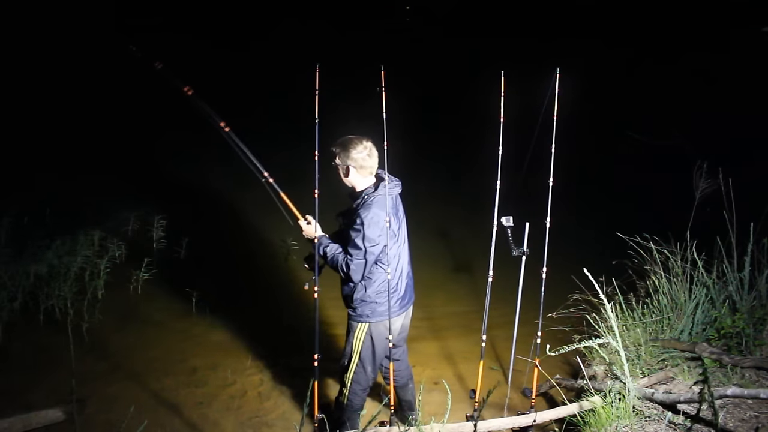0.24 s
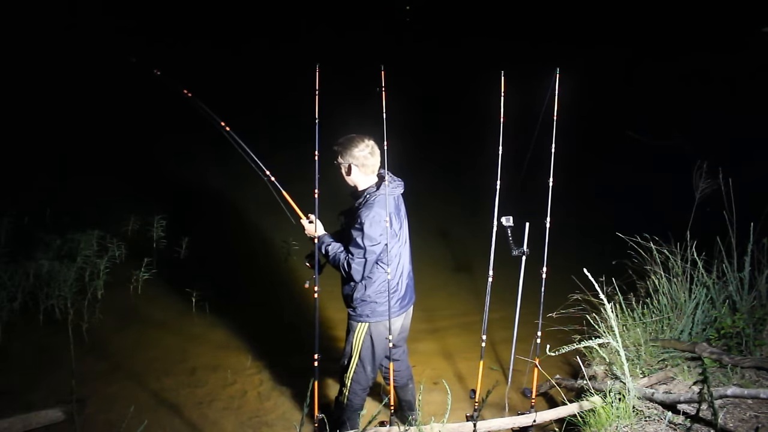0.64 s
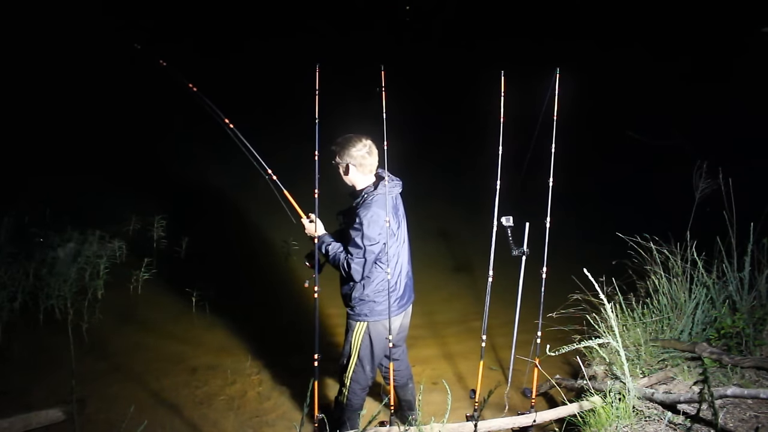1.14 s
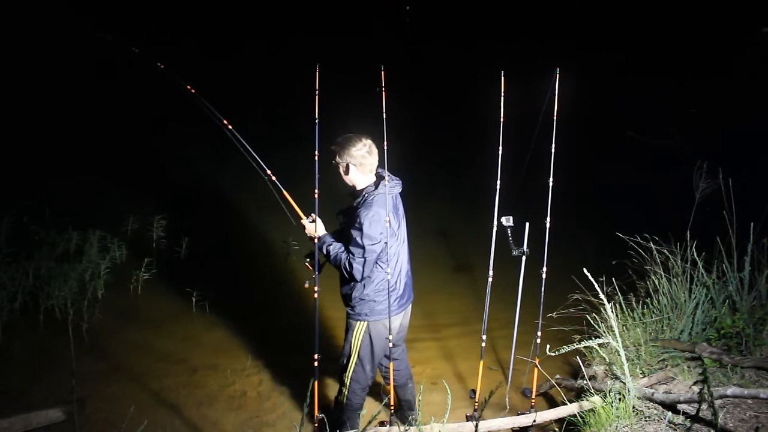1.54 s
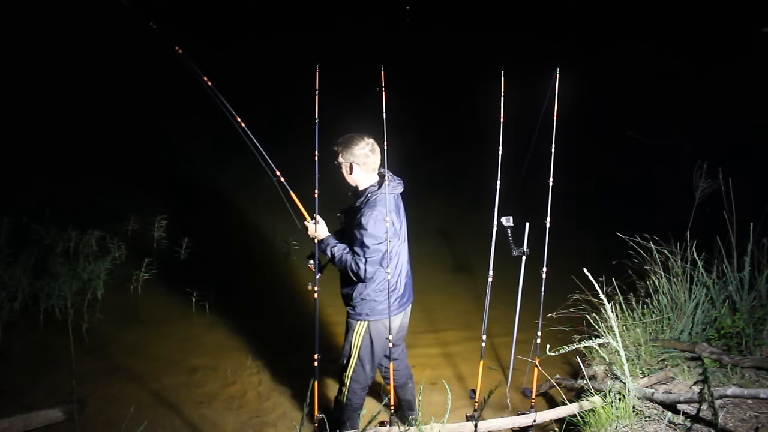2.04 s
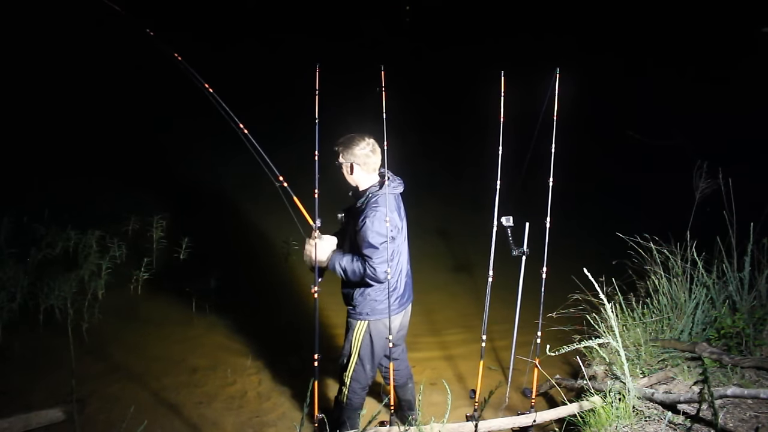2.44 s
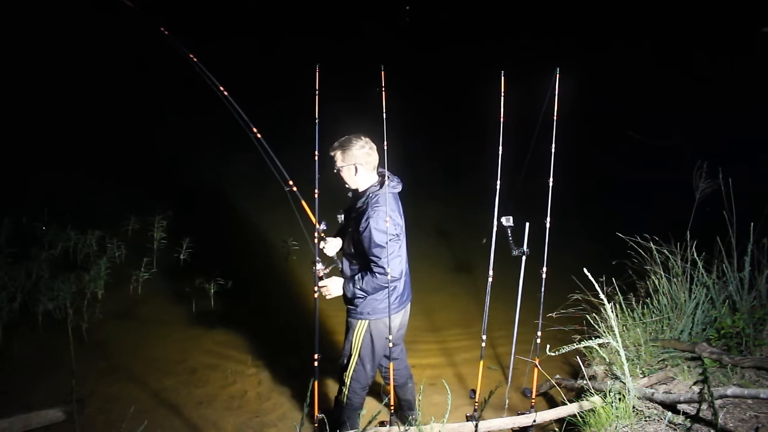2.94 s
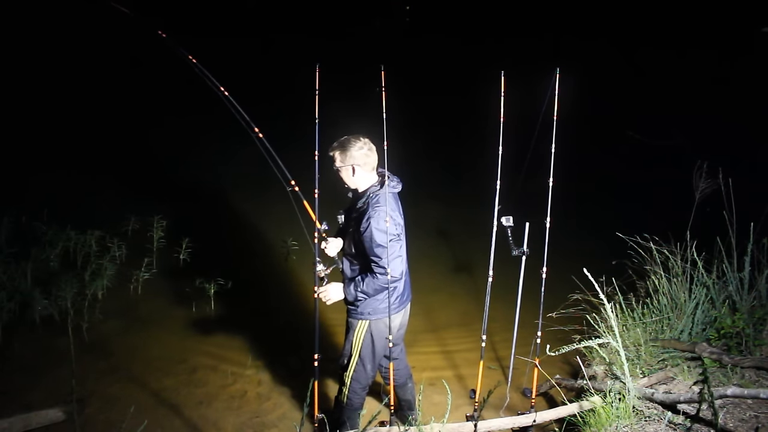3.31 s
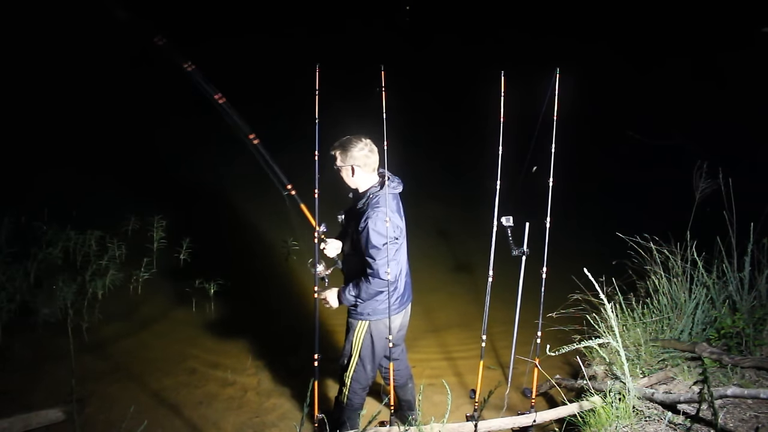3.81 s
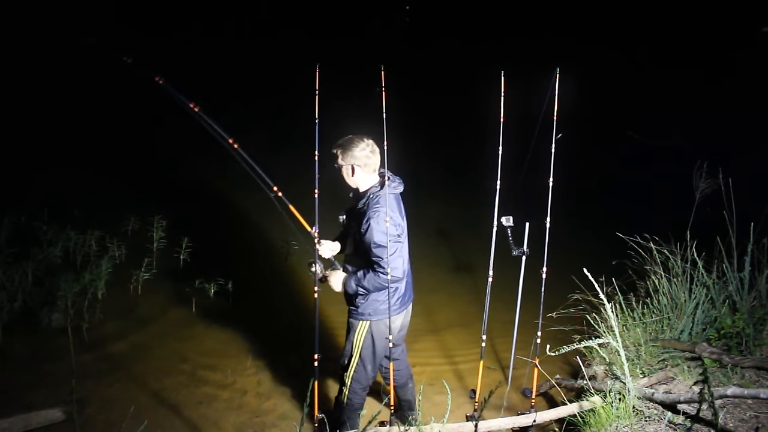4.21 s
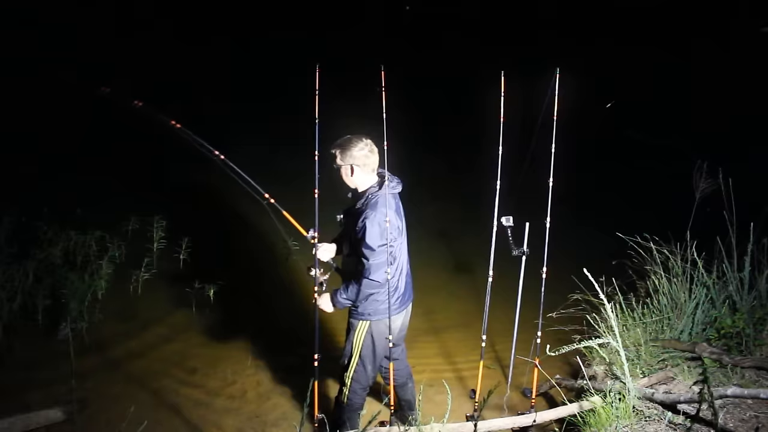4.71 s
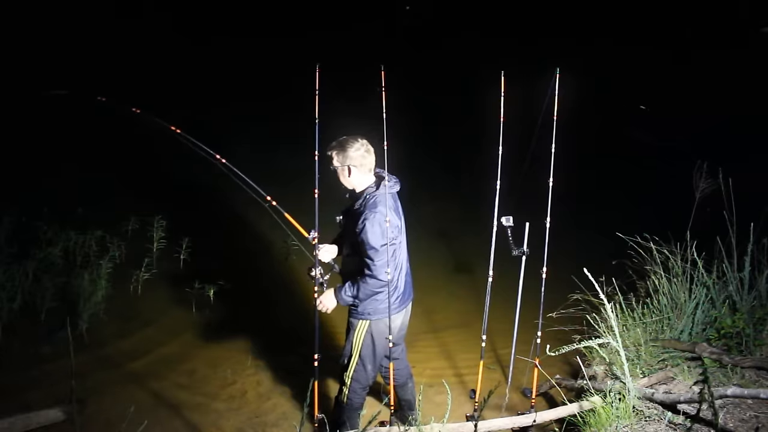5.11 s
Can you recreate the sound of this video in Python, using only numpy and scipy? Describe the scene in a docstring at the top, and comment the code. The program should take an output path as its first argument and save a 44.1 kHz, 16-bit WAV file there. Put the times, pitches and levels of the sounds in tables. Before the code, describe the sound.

A hooked fish thrashes and slaps in shallow water at night, settling to drips before a fishing reel whirrs and squeals, insects trilling throughout.

```python
"""Night on a river bank: insects trill between 5 and 6 kHz throughout, over a low far rumble and hiss.
At once a hooked fish thrashes: noise bursts make the slaps, droplet noise the spray, climbing sines the bubbles.
From about two seconds this dies away into drips and faint clicks.
Near four seconds the reel is wound in short pushes: ringing noise whirrs and thin tones squeal on top."""
import sys
import numpy as np
from scipy import signal
from scipy.fft import rfft, irfft, next_fast_len
from scipy.io import wavfile

SR = 44100
rng = np.random.default_rng(int(sys.argv[2]) if len(sys.argv) > 2 else 0)


def master(y):
    """Save y as 16-bit WAV."""
    cut = np.clip(np.atleast_2d(y).T, -1, 1)
    pcm = np.round(cut * 32767)  # scale
    wavfile.write(sys.argv[1], SR, pcm.astype(np.int16))


N = 235916
TIME = np.arange(N) / SR   # seconds


def from_db(db):
    """Turns a level in dB into a gain."""
    return 10 ** (np.asarray(db) / 20)


def rms_one(x):
    """Scales a sound to rms 1."""
    return x / np.sqrt(np.mean(x ** 2) + 1e-20)


def in_time(rows):
    """Draws straight lines between the rows of a curve, for every sample."""
    seconds, *columns = np.transpose(rows)
    return [np.interp(TIME, seconds, column) for column in columns]


def at_hz(points, hz, axis=1):
    """Reads one column of a spectrum on a log-frequency axis."""
    points = np.array(points)
    return np.interp(np.log(hz), np.log(points[:, 0]), points[:, axis])


def drift(rate_hz):
    """Smooth chance with spread 1: noise through a low-pass, worked out at every 40th sample."""
    step = 40
    r = np.exp(-2 * np.pi * rate_hz * step / SR)
    noise = rng.standard_normal(N // step + 2002)
    slow = signal.lfilter([1], [1, -2 * r, r * r], noise)[2000:]   # skip the filter's start
    return np.interp(np.arange(N) / step, np.arange(len(slow)), rms_one(slow))


def resonance(x, hz, width_hz):
    """Lets through one peak of frequencies, with gain 1 on top."""
    r = np.exp(-np.pi * width_hz / SR)
    feedback = [1, -2 * r * np.cos(2 * np.pi * hz / SR), r * r]
    return signal.lfilter([(1 - r * r) / 2, 0, (r * r - 1) / 2], feedback, x)


def coloured(x, spectrum):
    """Shapes a sound by a spectrum, then scales it to rms 1."""
    hz = np.fft.rfftfreq(N, 1 / SR) + 1   # + 1 keeps the logarithm finite
    return rms_one(irfft(rfft(x) * from_db(at_hz(spectrum, hz)), N))


def add(out, start, sound):
    """Mixes a short sound in at a time in seconds."""
    i = round(start * SR)
    out[i:i + len(sound)] += sound[:N - i]


def held(start, length, attack, release):
    """Rises from the start, holds, and falls after the length (all in seconds); 0 to 1."""
    rising = (TIME - start) / attack
    falling = 1 - (TIME - start - length) / release
    return np.clip(np.minimum(rising, falling), 0, 1)


# Colour of the still background. Each row: frequency in Hz, relative level in dB.
NIGHT_SPECTRUM = [(25, -25), (55, -5.5), (115, 1), (160, -3), (400, -5), (800, -11), (1600, -11.5),
                  (3200, -15.5), (4600, -17.5), (7000, -21), (10500, -24), (13000, -29), (16000, -29)]
# How alike left and right are. Each row: frequency in Hz, likeness from -1 (opposite) to 1 (same).
NIGHT_LIKENESS = [(60, 0.88), (150, 0.31), (380, -0.16), (950, -0.48), (2380, -0.31), (5980, -0.082),
                  (15000, -0.18)]
NIGHT_DB = -51


def night():
    """Far rumble and hiss: shared noise and opposed noise are mixed by likeness at each frequency."""
    hz = np.fft.rfftfreq(N, 1 / SR) + 1
    alike = np.clip(at_hz(NIGHT_LIKENESS, hz), -1, 1)
    mid, side = rfft(rng.standard_normal((2, N))) * from_db(at_hz(NIGHT_SPECTRUM, hz))
    pair = irfft(np.sqrt(1 + alike) * mid + np.sqrt(1 - alike) * side * [[1], [-1]], N)
    return from_db(NIGHT_DB) * rms_one(pair) * from_db([[-.7], [.7]])   # right a little louder


# The insect chorus. Each row: pitch in Hz, width of its wandering in Hz, level in dB.
INSECT_CHORUS = [(5020, 200, -62), (5228, 16, -58), (5262, 60, -58), (5336, 30, -59), (5600, 160, -66),
                 (5742, 30, -65), (5823, 50, -65), (5915, 30, -69), (10500, 120, -77)]
TRILL_PER_S = 37.35


def insects():
    """Each singer is a wavering tone pulsed in groups of three wing strokes; far ones blur into narrow noise."""
    turn = 2 * np.pi * TRILL_PER_S * TIME
    pulsing = 1 + .33 * np.cos(turn + 1.8) + .2 * np.cos(3 * turn + 3.0)
    out = np.zeros((2, N))
    for hz, width_hz, level_db in INSECT_CHORUS:
        pitch = hz + .5 * width_hz * drift(40.37)
        near = np.sqrt(2) * np.sin(2 * np.pi * np.cumsum(pitch) / SR)
        noise = rng.standard_normal((2, N))
        far = resonance(resonance(noise, hz, width_hz + 40), hz, 2.0 * width_hz + 40)
        out += from_db(level_db) * (near * pulsing + 1.22 * rms_one(far))
    out[1] = np.roll(out[1], 1)   # the near singers reach the left one sample earlier
    return out * from_db(0.11 * drift(2.5)) * from_db([[-1.1], [.1]])


# Whirrs of the reel: pushes and one weaker idle stretch between them.
# Each row: start in seconds, length in seconds, whirr level in dB.
REEL_WHIRRS = [(3.842, 0.29, -50), (4.17, 0.26, -50.5), (4.437, 0.21, -57), (4.583, 0.315, -50.5)]
# Ringing tones of the reel housing. Each row: frequency in Hz, width in Hz, relative level in dB.
HOUSING_MODES = [(830, 55, 0), (982, 40, -3.5), (1230, 120, -0.5), (1500, 210, 7), (1640, 30, 0),
                 (2070, 180, -15), (2660, 230, -6), (3300, 130, -27)]
# Short squeals of the gears, mostly climbing.
# Each row: start in seconds, length in seconds, first pitch in Hz, last pitch in Hz, level in dB.
GEAR_SQUEALS = [(3.954, 0.027, 1496, 1505, -55), (4.042, 0.073, 1533, 1640, -51),
                (4.199, 0.077, 1050, 1460, -58), (4.266, .1, 1517, 1850, -59),
                (4.403, 0.057, 1650, 1673, -54), (4.65, 0.098, 1650, 1677, -48),
                (4.747, 0.038, 984, 1020, -47.5), (4.767, .035, 1316, 1310, -44),
                (4.804, 0.021, 1400, 1620, -47), (4.843, 0.046, 1320, 1330, -54),
                (4.897, 0.035, 1400, 1645, -52)]
WHIRR_ATTACK_S, WHIRR_RELEASE_S, SQUEAL_EDGE_S = 0.11, 0.09, 0.0069


def reel():
    """Rough gear contacts ring the housing; a hoarse whine rides on top. It sits a little to the right."""
    whirr = np.zeros(N)
    for start, length, level_db in REEL_WHIRRS:
        whirr += from_db(level_db) * held(start, length, WHIRR_ATTACK_S, WHIRR_RELEASE_S)
    rub = rng.standard_normal(N) * from_db(1.0 * drift(66))
    housing = np.zeros(N)
    for hz, width_hz, level_db in HOUSING_MODES:
        housing += from_db(level_db + 2.5 * drift(8)) * rms_one(resonance(rub, hz, width_hz))
    waver_hz = 30 * drift(94)
    hoarse = 0.85 + 0.36 * drift(45)
    whine = np.zeros(N)
    for start, length, first_hz, last_hz, level_db in GEAR_SQUEALS:
        pitch = np.interp(TIME, [start, start + length], [first_hz, last_hz]) + waver_hz
        tone = np.sin(2 * np.pi * np.cumsum(pitch) / SR)
        whine += from_db(level_db) * held(start, length, SQUEAL_EDGE_S, SQUEAL_EDGE_S) * tone
    return (whirr * rms_one(housing) + hoarse * whine) * from_db([[-1.2], [1.2]])


# The microphone pair for sound from the water. Each row: frequency in Hz, left minus right in dB,
# lead of the left in radians, level of the scattered echoes in dB.
MICROPHONES = [(98, -4, 0.12, 2), (396, -4, 0.38, -23), (900, -2, 0.38, -12), (2730, 0.5, 0.61, -10),
               (6800, 0, 0.96, -9.5), (9400, -4, 1.27, -1.5), (16000, 0, 3.1, -3)]


def microphone_pair(x):
    """Left and right differ in level and phase; short echoes off the bank differ in each."""
    size = next_fast_len(N + SR // 4)
    hz = np.fft.rfftfreq(size, 1 / SR) + 1
    t = np.arange(SR // 5) / SR
    # half of the difference goes to the left, the opposite half to the right
    half = from_db(at_hz(MICROPHONES, hz, axis=1) / 2) * np.exp(.5j * at_hz(MICROPHONES, hz, axis=2))
    direct = np.array([half, 1 / half])
    echoes = rng.standard_normal((2, len(t))) * from_db(-60 * t / 0.17)   # 60 dB down in 0.17 s
    echoes = echoes / np.linalg.norm(echoes, axis=1, keepdims=True)
    scattered = from_db(at_hz(MICROPHONES, hz, axis=3)) * rfft(echoes, size)
    return irfft(rfft(x, size) * (direct + scattered), size)[:, :N]


def water_ring(level_db, hz, t60, rise, rough=0.):
    """A damped sine that climbs, as a bubble does when it nears the surface; its level wavers at random."""
    t = np.arange(int(1.2 * t60 * SR) + 8) / SR
    swell = 1 - np.exp(-t * hz / 0.42)   # starts within about half a cycle
    waver = 1 + rough * np.interp(t * hz / 3, np.arange(60), rng.standard_normal(60))
    tone = np.sin(2 * np.pi * hz * (t + rise * t * t / 2))
    return from_db(level_db - 60 * t / t60) * swell * waver * tone


# Water rings: bubbles, drips and the brief ring of slap cracks.
# Each row: start in seconds, level in dB, first pitch in Hz, time to fall 60 dB in seconds.
WATER_RINGS = [(0.024, -38, 470, 0.061), (.047, -19.5, 662, 0.045), (0.086, -34, 570, 0.048),
               (.105, -28, 680, 0.048), (.19, -37, 422, 0.18), (.224, -28, 444, 0.13),
               (.258, -26, 650, 0.097), (0.28, -21, 530, 0.02), (.303, -26, 463, 0.036),
               (.332, -28, 624, 0.031), (.376, -26.5, 331, 0.072), (0.413, -34, 207, 0.081),
               (.573, -24.5, 348, 0.027), (0.591, -29, 440, 0.053), (.636, -31, 145, 0.09),
               (0.7262, -18.5, 870, 0.02), (0.812, -27.5, 340, 0.027), (0.846, -38, 234, 0.11),
               (.886, -21, 980, .04), (.909, -25, 1010, 0.019), (.944, -33.5, 776, 0.12),
               (.977, -24.5, 526, 0.036), (0.995, -16.5, 397, 0.022), (.997, -28, 225, 0.1),
               (.9962, -6, 2500, .006), (.997, 0, 2150, .005), (1.007, -19, 510, 0.029),
               (1.014, -27, 380, 0.013), (1.079, -34.5, 1116, 0.053), (1.19, -34.5, 650, .037),
               (1.203, -30.5, 1462, 0.096), (1.206, -30, 4120, .039), (1.245, -34, 770, 0.035),
               (1.285, -41, 406, 0.044), (1.294, -31, 944, 0.039), (1.35, -28, 734, 0.03),
               (1.469, -35.5, 1050, 0.047), (1.479, -27, 2600, 0.013), (1.54, -42.5, 334, 0.086),
               (1.583, -38.5, 410, 0.12), (1.594, -34, 1020, 0.038), (1.656, -41, 1020, 0.11),
               (1.704, -23.5, 1130, 0.017), (1.71, -25.5, 258, .19), (1.71, -26, 336, 0.083),
               (1.835, -50, 462, .19), (1.885, -49, 897, 0.049), (1.976, -37, 959, 0.066),
               (2.07, -41.5, 4100, .04), (2.08, -49, 605, 0.087), (2.124, -35, 1440, 0.034),
               (2.135, -38.5, 952, 0.062), (2.15, -35, 860, 0.053), (2.188, -38, 4630, .023),
               (2.217, -39.5, 2400, .015), (2.292, -41, 2320, .02), (2.355, -46, 4000, .027),
               (2.413, -40, 1660, 0.026), (2.46, -47.5, 714, 0.043), (3.077, -46, 1630, .02),
               (3.433, -45.5, 600, 0.036), (4.042, -45.5, 543, 0.2), (4.042, -41, 2930, 0.027),
               (5.038, -46, 3040, 0.065), (5.07, -44, 1200, 0.017)]
# Thin bright ticks. Each row: start in seconds, level in dB.
BRIGHT_TICKS = [(0.407, -34.5), (.7926, -36), (1.813, -41), (2.3461, -48), (2.4588, -48), (2.4998, -46),
                (3.0784, -47), (3.452, -45), (4.0417, -48), (4.9013, -49.5), (5.0357, -48.5), (5.064, -45)]
RING_RISE_PER_S = 1.16   # share of the first pitch
# Stray drips start at a time and thin out from then on.
DRIPS_FROM_S, DRIPS_THIN_S = 1.75, 0.41
DRIP_DB, DRIP_SPREAD_DB, DRIP_CYCLES = -52, 2, 54   # cycles: how many to fall 60 dB
TICK_HZ, TICK_WIDTH_HZ = 8800, 3600


def rings_and_ticks():
    """Water rings and stray drips are climbing sines; bright ticks are short noise bursts."""
    out = np.zeros(N)
    for start, level_db, hz, t60 in WATER_RINGS:
        add(out, start, water_ring(level_db, hz, t60, RING_RISE_PER_S, rough=.22))
    for when, size, pitch in rng.random((60, 3)):
        start = DRIPS_FROM_S - DRIPS_THIN_S * np.log(when)
        hz = 900 * 5 ** pitch
        level_db = DRIP_DB - DRIP_SPREAD_DB * np.log(size + 0.15)
        if start < N / SR:
            add(out, start, water_ring(level_db, hz, DRIP_CYCLES / hz, RING_RISE_PER_S))
    t = np.arange(SR // 20) / SR
    for start, level_db in BRIGHT_TICKS:
        burst = rms_one(resonance(rng.standard_normal(len(t)), TICK_HZ, TICK_WIDTH_HZ))
        add(out, start, from_db(level_db - 60 * t / 0.012) * burst)
    return out


# Colour of the spray. Each row: frequency in Hz, relative level in dB.
SPRAY_SPECTRUM = [(530, -33), (900, -8), (1470, 3), (1770, 1.5), (5350, -3.5), (9530, -14), (14900, -22),
                  (16000, -35)]


def patter():
    """Droplets of uneven size, as random clicks, over a rush of noise."""
    falls = rng.random(N) < 6000 / SR   # about 6000 droplets a second
    size_db = 1.3 * np.minimum(rng.exponential(1, N), 4)
    drops = falls * rng.standard_normal(N) * from_db(size_db)
    rush = .6 * rng.standard_normal(N)
    return coloured(rms_one(drops) + rush, SPRAY_SPECTRUM) * from_db(1.2 * drift(25))


# Churned water calming down. Each row: time in seconds, gurgle level in dB, spray level in dB.
CALMING = [(0, -35.5, -37.5), (.14, -39, -36), (.28, -42.5, -38), (.36, -39.5, -39), (.44, -41.5, -37),
           (.54, -46.5, -43), (.62, -38.5, -43.5), (.74, -47, -44), (.86, -46, -43), (.97, -46, -44),
           (1.09, -60, -43.5), (1.26, -48.5, -42.5), (1.44, -57.5, -45.5), (1.67, -48.5, -43),
           (1.8, -62, -55.5), (1.96, -56, -49.5), (2.22, -68.5, -54), (3.0, -72, -73)]
# Colour of the gurgle. Each row: frequency in Hz, relative level in dB.
GURGLE_SPECTRUM = [(88, -45), (150, -49), (209, -12), (260, -20), (626, -2), (907, 0), (4000, -15),
                   (5200, -28), (8800, -120)]


def churn():
    """A crowd of small bubbles on rushing noise at the fish; droplets fall there and all around."""
    gurgle_db, spray_db = in_time(CALMING)
    end = CALMING[-1][0]
    crowd = np.zeros(N)
    for when, size, pitch, cycles in rng.random((5000, 4)):
        hz = 250 * 16 ** pitch
        level_db = -3.5 * np.log(size + 0.0098)   # a few are much louder
        add(crowd, when * end, water_ring(level_db, hz, (6.3 + 18 * cycles) / hz, 4.0))
    brighter = rms_one(signal.lfilter([1, -.9], [1], crowd))
    gurgle = coloured(brighter + .3 * rng.standard_normal(N), GURGLE_SPECTRUM)
    fade = np.clip((end + .3 - TIME) / .3, 0, 1)
    near = from_db(gurgle_db) * gurgle + from_db(spray_db) * patter()
    high_pass = signal.butter(1, 4000, "high", fs=SR, output="sos")
    around = signal.sosfilt(high_pass, [patter(), patter()])   # separate left and right
    return near * fade, from_db(spray_db - 1.0) * around * fade


# Slaps, sharp drips and clicks. Each row: start in seconds, crack level in dB, low edge in Hz,
# high edge in Hz, time for the wash to fall 60 dB in seconds.
SLAPS_AND_CLICKS = [(0.017, -25, 895, 3340, 0.11), (0.373, -31, 200, 2500, 0.7),
                    (.64, -27, 704, 2960, 0.093), (0.7279, -19.5, 780, 10200, 0.092),
                    (0.813, -28, 250, 2440, .07), (.853, -26.5, 200, 3480, 0.12),
                    (.887, -32, 500, 3000, 0.088), (.9425, -24, 900, 3700, .08),
                    (.996, -11, 200, 12500, .1), (1.006, -17, 302, 7700, .23),
                    (1.013, -37, 200, 2000, 0.027), (1.2, -30.5, 810, 6340, 0.25),
                    (1.33, -35, 590, 8000, 0.45), (1.4779, -31, 890, 5000, 0.097),
                    (1.629, -36, 1490, 11000, 0.058), (1.706, -37, 590, 8050, 0.29),
                    (1.708, -31.5, 500, 6000, 0.033), (1.789, -43, 1000, 4000, 0.072),
                    (1.938, -39, 1000, 11000, 0.057), (1.98, -41, 1500, 5000, .07),
                    (2.15, -42, 1500, 4000, .05), (2.216, -42.5, 700, 2960, 0.069),
                    (2.284, -40, 1830, 4500, 0.11), (2.291, -48, 1300, 4000, .08),
                    (2.429, -48, 1500, 4000, 0.065), (2.64, -54, 1500, 5000, .08),
                    (2.905, -48, 900, 5000, .06), (3.445, -46.5, 1180, 8000, .09),
                    (3.908, -47, 1500, 4000, 0.1), (3.95, -48, 3000, 5000, .05),
                    (5.036, -48, 2950, 4140, 0.16)]
WEAK_CRACK_DB = -44.5   # a harder crack than this stands further above its wash
WASH_DB, WASH_LOSS_PER_DB = -3.5, 0.12   # wash against crack
CRACK_T60_S, CRACK_ATTACK_S = 0.0066, 0.00043


def slaps_and_clicks():
    """Each is band-limited noise: a crack of a few ms, then a lumpy wash, as of thrown water in a slap."""
    out = np.zeros(N)
    t = np.arange(SR // 4) / SR
    lumps = from_db(2.6 * drift(140))
    for start, crack_db, low_hz, high_hz, t60 in SLAPS_AND_CLICKS:
        hard_db = max(crack_db - WEAK_CRACK_DB, 0)
        band = signal.butter(3, [low_hz, high_hz], "band", fs=SR, output="sos")
        noise = signal.sosfilt(band, rng.standard_normal(len(t)))
        noise = signal.lfilter([1], [1, -.6], noise)   # softens the treble
        crack = from_db(-60 * t / CRACK_T60_S)
        wash = from_db(WASH_DB - WASH_LOSS_PER_DB * hard_db - 60 * t / t60)
        wash = wash * lumps[round(start * SR):][:len(t)]
        attack = 1 - np.exp(-t / CRACK_ATTACK_S)
        add(out, start, from_db(crack_db) * rms_one(noise) * (crack + wash) * attack)
    return out


def scene():
    """Water through the microphone pair, with spray around, reel, insects and background."""
    near, around = churn()
    water = microphone_pair(near + slaps_and_clicks() + rings_and_ticks())
    return water + around + reel() + insects() + night()


def record(dry):
    """Limits the peaks and cuts the top steeply: 60 dB down from 16150 Hz."""
    low_pass = signal.cheby2(14, 60, 16150, fs=SR, output="sos")
    return signal.sosfilt(low_pass, np.clip(dry, -1, 1))


dry = scene()
out = record(dry)
master(out)
```